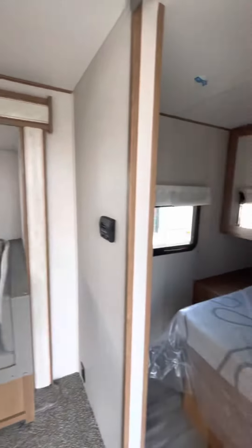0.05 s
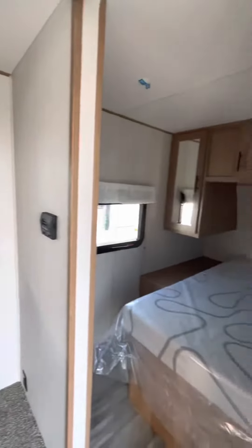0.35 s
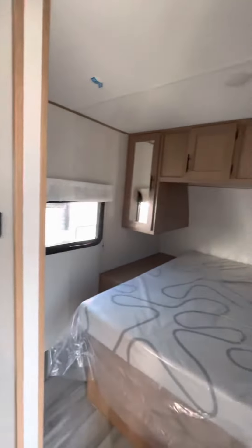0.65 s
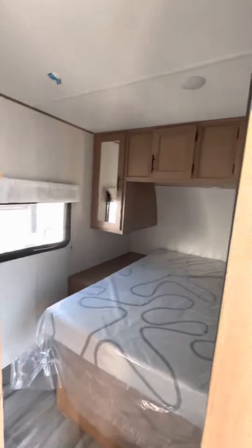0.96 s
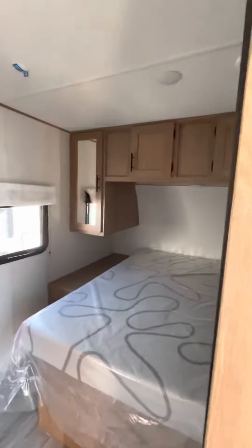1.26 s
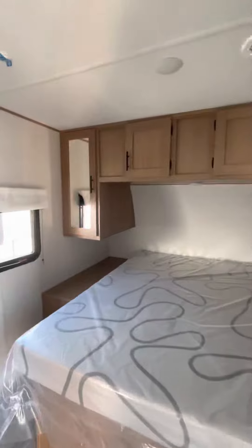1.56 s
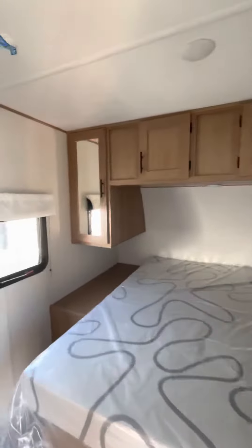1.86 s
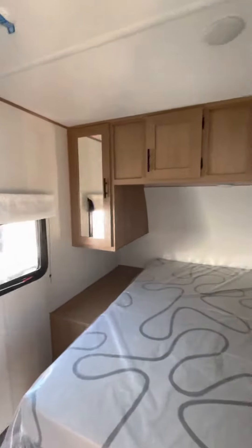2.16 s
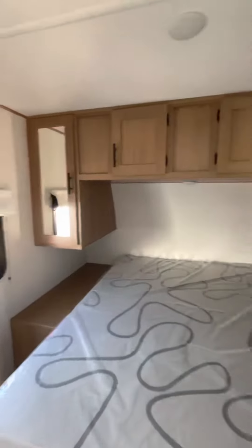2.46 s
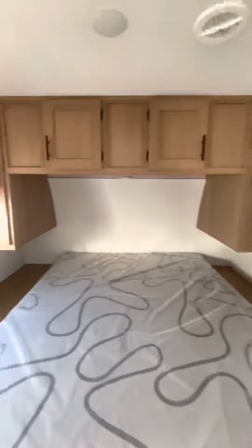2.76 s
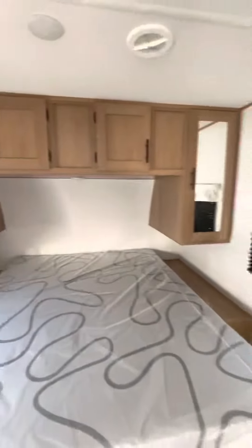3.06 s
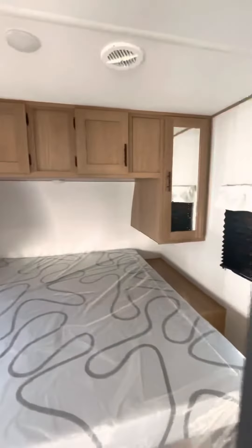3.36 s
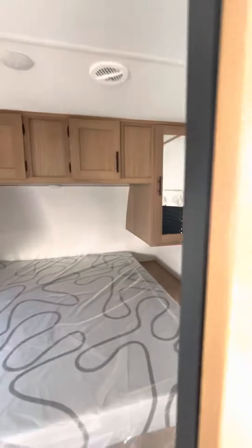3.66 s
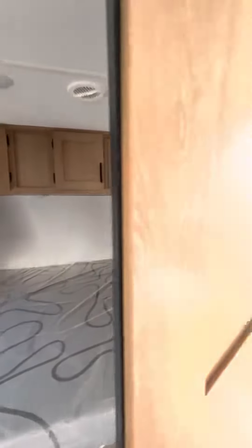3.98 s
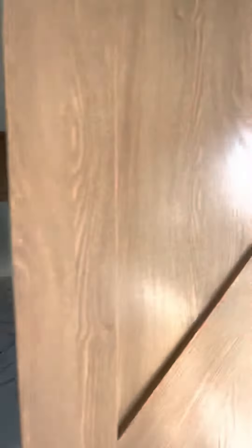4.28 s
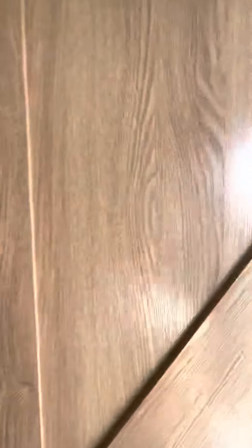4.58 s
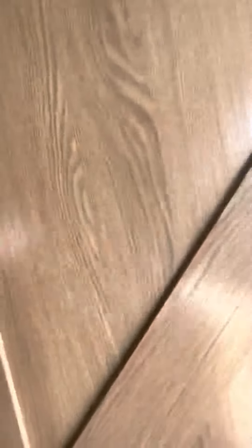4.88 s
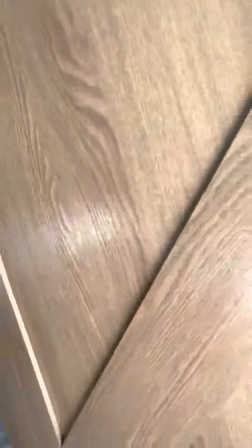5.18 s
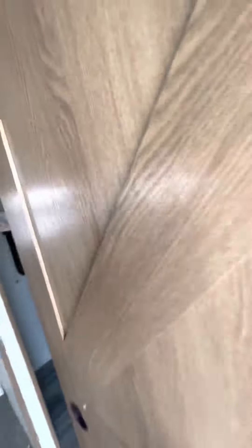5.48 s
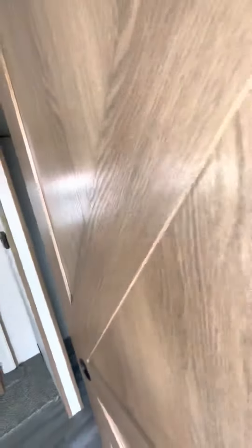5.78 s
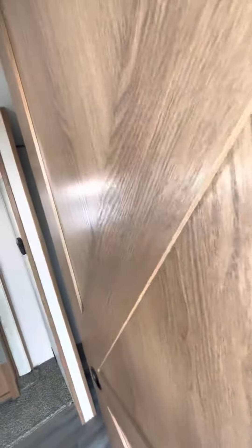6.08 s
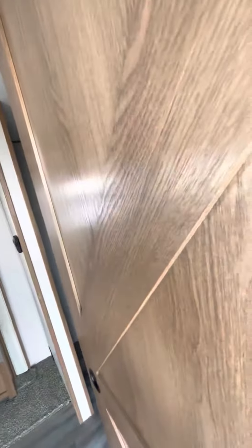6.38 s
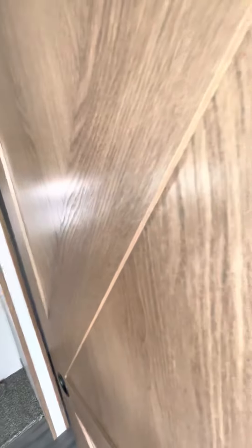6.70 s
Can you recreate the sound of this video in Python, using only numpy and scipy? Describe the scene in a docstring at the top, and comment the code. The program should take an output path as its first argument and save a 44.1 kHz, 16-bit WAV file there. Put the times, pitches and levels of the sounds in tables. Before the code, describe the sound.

A low motor hum runs throughout inside a small travel trailer, gently swelling and fading. In the first second a vehicle passes quietly outside with a soft rush of tyres. Soft, dull footsteps sound on the hollow floor at the start and around 1.5 and 2.5 seconds, then come closer together from 4 seconds. Keys jingle faintly on and off between 2 and 6 seconds. Another vehicle passes around 4.5 seconds with a faint, falling tyre whine. At about 5.6 seconds a light wooden sliding door taps close by, rattles, and knocks hard against its frame at 6 seconds. It rolls briefly and knocks again, louder, at about 6.4 seconds. A metal catch snaps sharply just after, and the door scrapes softly along its track until about 7 seconds. The knocks and snap are much the loudest sounds, with a short cabin ring.

```python
"""Inside a small travel trailer, someone walks the hollow floor with keys jingling faintly.
They handle a light wooden sliding door: its panel rings as it rattles, rolls and knocks twice hard
against the frame, then the metal catch snaps and the door scrapes on along its track.
A motor hums on a low note and its octave. Behind the thin walls, road noise swells and fades
as vehicles pass, the tyres of the nearer ones singing and sinking in pitch."""
import sys
import numpy as np
from scipy import signal
from scipy.fft import rfft, irfft, next_fast_len
from scipy.io import wavfile
from scipy.ndimage import uniform_filter1d, map_coordinates

SR = 44100
rng = np.random.default_rng(int(sys.argv[2]) if len(sys.argv) > 2 else 0)


def store_pcm(level_fs):
    """Save levels as 16-bit WAV."""
    pcm = np.round(np.clip(level_fs, -1, 1) * 32767).astype(np.int16)
    wavfile.write(sys.argv[1], SR, np.atleast_2d(pcm).T)


N = 306054
RING_TIME = np.arange(SR // 2) / SR  # the half second that one hit may ring

# The motor's sagging note. Each row: time in seconds, pitch in Hz.
MOTOR_PITCH = [(0, 73.3), (.6, 72.4), (1.1, 71.7), (6.94, 71.6)]
# Fader rides for its fundamental and octave. Each row: time in seconds, level in dB.
HUM_FADER = [(0, -45.5), (1, -41.5), (2.7, -58.5), (3.6, -49.5), (4.7, -43), (5.5, -55), (6.9, -48.5)]
OCTAVE_FADER = [(0, -42.5), (1, -45), (2.4, -60.5), (2.75, -55), (3.4, -53), (3.7, -77), (4.1, -62)]

# Vehicle pass-bys. Each row: nearest moment, swell and fade in seconds, level and brightness in dB.
PASSES = [(.62, 0.54, 0.67, -49, -5), (4.45, 0.36, 0.82, -53, -1), (5.45, 0.52, 1, -60, 3)]
# Tyre whines. Each row: peak, swell and fade in seconds, centre pitch, total pitch drop and
# half-width in Hz, pure tone over noise in dB, level in dB.
WHINES = [(0.201, .25, 0.41, 1016, 20, 61, -14, -49), (4.64, 0.149, 0.27, 1285, 110, 30.5, -0.5, -49.5)]
# Noise colours for road, floor and door. Each row: frequency in Hz, spectral density in dB.
RUMBLE_EQ = [(20, -39), (30, -16), (45, -3), (95, 1.5), (130, -4), (200, -11.5), (400, -15), (700, -15),
             (1000, -32), (2000, -77)]
RUSH_EQ = [(400, -60), (620, -11.5), (830, 2.5), (1050, 2), (1400, -4), (1800, -24.5), (2500, -57)]
EDGE_EQ = [(1000, -18), (1450, 3.5), (1850, 0.5), (2300, -4), (2700, -7), (3400, -23.5), (6000, -40),
           (12000, -65)]
HISS_EQ = [(1650, -11.5), (2800, -5), (3310, -3.5), (4870, -8.5), (6050, -6), (9060, -20.5), (9820, -34),
           (11100, -12.5), (12400, -29), (16100, -61), (22000, -120)]
WOOD_EQ = [(59, -37), (100, -17), (156, -21), (263, -6.5), (402, -0.5), (900, -5.5), (1120, -14.5),
           (1370, -17.5), (1820, -20.5), (2060, -21.5), (2420, -18.5), (3840, -31.5), (6750, -29),
           (9900, -44.5), (12400, -27.5), (16100, -73), (22000, -120)]
METAL_EQ = [(88, -50), (150, -11.5), (256, -1), (338, -7.5), (399, 0), (734, -4), (820, -13.5), (1120, -3),
            (1710, -10), (3100, -9), (4650, -16), (6600, -8), (9370, -23), (11100, -15), (12400, -36),
            (16100, -72), (22000, -120)]
TRACK_EQ = [(110, -12), (180, -7.5), (365, -2), (444, -13), (655, -8.5), (885, -14), (1020, -14.5),
            (1670, -22), (2850, -13), (7940, -28), (9480, -29), (11100, -17), (12400, -49), (16100, -72),
            (22000, -120)]

# Footfalls on the hollow floor. Each row: start in seconds, boom in dB, knock in dB.
STEPS = [(0.11, -32, -44.5), (1.455, -47, -44.5), (2.495, -41.5, -48), (4.023, -37.5, -53.5),
         (4.608, -31, -39), (4.762, -26.5, -53), (5.058, -35, -52), (5.129, -35, -43), (5.609, -34, -33),
         (6.721, -33, -47)]
# The keys swing together. Each row: strike in seconds, level in dB, large-key and scrape trims in dB.
JINGLES = [(1.9528, -61, -12, 3.5), (2.0343, -46, -28, -5.5), (2.2686, -50, -12, 5.5),
           (2.3005, -45.5, -20, 3.5), (2.4234, -56.5, -5, 2.5), (2.5004, -58.5, -18, 5),
           (2.645, -58.5, -1, -3), (2.8513, -66.5, -2, 11), (2.9022, -63.5, 1, -4),
           (3.2888, -48.5, -4, 4.5), (3.4821, -45.5, -0.5, -5), (3.6498, -54, -1, -1),
           (4.0282, -49, -4, -2), (4.9084, -41.5, -8.5, -2), (5.047, -54.5, -2.5, -11),
           (5.775, -50.5, -2, -5)]
# Door against frame. Each row: start in seconds, level in dB, hardness (added treble) in dB.
KNOCKS = [(5.573, -35, 5), (5.584, -39, 13.5), (5.977, -12, 1), (6.326, -37.5, -28), (6.418, -26, -11),
          (6.430, -7.5, -1), (6.449, -18.5, 11.5), (6.485, -33, 14)]
# The runners' squeak. Each row: time in seconds, pitch in Hz, level in dB.
SQUEAK = [(6.22, 6200, -110), (6.26, 5970, -73), (6.3, 5700, -70), (6.345, 5420, -70), (6.38, 5300, -110)]
# Fader ride for the scrape along the track. Each row: time in seconds, level in dB.
GLIDE_FADER = [(6.5, -120), (6.62, -55), (6.72, -52), (6.8, -41), (6.86, -44.5), (6.9, -40), (6.94, -48)]
# The catch snaps home. Each row: start in seconds, level in dB.
SNAPS = [(6.544, -19), (6.546, -12), (6.5499, -16.5), (6.56, -47)]
# Resonances of the struck parts. Each row: pitch in Hz, level in dB, 60 dB decay in seconds.
SMALL_KEY_MODES = [(10970, 1.5, 0.33), (11600, -5.5, 0.35), (11300, -15, 0.055), (14850, -2, .12)]
LARGE_KEY_MODES = [(6530, 2, 0.081), (8530, 14.5, 0.22), (9100, 5, 0.18), (9200, 1.5, 0.15)]
PANEL_MODES = [(127, -18.5, 0.28), (228, -6, 0.21), (270.5, -2, 0.26), (349.5, -1, 0.11), (389, -2.5, 0.15),
               (451.5, -2.5, 0.1), (528, -7, 0.076), (576, -2.5, 0.1), (658, 0, 0.18), (749, -1, 0.2),
               (1033, -7, 0.12), (1060, -15, 0.1), (1133, -12.5, 0.14), (1301, -15, 0.069),
               (1490, -20.5, 0.19), (1942, -23, 0.14), (2434, -15, 0.072)]
CATCH_MODES = [(506, 1, 0.12), (641, -3, .15), (734, -2, 0.24), (1118, 10.5, 0.11), (1285, 4, 0.05),
               (1974, -4.5, 0.19), (2800, 5.5, 0.08), (2990, 8, 0.1), (3250, -3, 0.11), (4100, 3, 0.072),
               (5450, 0, 0.07), (5900, -10, 0.039), (6435, -17.5, 0.16)]

# The cabin's short reverb. Each row: frequency in Hz, 60 dB decay in seconds.
CABIN_DECAY = [(100, 0.83), (300, 0.31), (1000, 0.34), (3000, 0.28), (6500, 0.28), (12000, 0.31)]
# Stereo width. Each row: frequency in Hz, left-right correlation from -1 to 1.
CORRELATION = [(60, 0.97), (330, 0.99), (600, 0.12), (1230, 0.94), (2630, -0.03), (5600, 0.11),
               (11900, -0.38)]
# The microphone's top end. Each row: frequency in Hz, gain in dB.
MIC_EQ = [(12300, 0), (13000, -38), (15200, -12)]
# Stereo balance. Each row: frequency in Hz, left over right in dB.
BALANCE = [(60, -3.5), (190, -1.5), (400, -7), (1130, -4.5), (2040, 0), (12000, -1)]
# Phase between the channels. Each row: frequency in Hz, the left's lead in radians.
LEFT_LEAD = [(300, 0.25), (550, 0), (800, 0.71), (1200, 1), (2700, 0.0078), (5000, 0.33), (8000, 0)]


def amp(db):
    """Decibels to gain."""
    return 10 ** (np.asarray(db) / 20)


def unit(x):
    """Normalise to rms 1."""
    return x / np.sqrt(np.mean(x ** 2) + 1e-20)


def crest(x):
    """Normalise a stereo hit so that its loudest 6 ms have rms 1."""
    return x / np.sqrt(uniform_filter1d(np.mean(x ** 2, 0), size=256).max() + 1e-20)


def along(points, hz):
    """Read a curve of (Hz, value) points on a log frequency axis."""
    freqs, values = np.transpose(points)
    return np.interp(np.log(hz + 1), np.log(freqs + 1), values)


def automation(rows):
    """One curve, sample by sample, for each column after the time."""
    times, *columns = np.transpose(rows)
    return [np.interp(np.arange(N) / SR, times, column) for column in columns]


def wobble(rate):
    """Smooth random modulation, with rate knots a second."""
    return map_coordinates(rng.standard_normal(int(N * rate / SR) + 4), [np.arange(N) * rate / SR])


def eq(x, response):
    """Shape a sound with a gain that depends on frequency."""
    size = x.shape[-1]
    padded = next_fast_len(size + 8192)
    return irfft(rfft(x, padded) * response(np.fft.rfftfreq(padded, 1 / SR)), padded)[..., :size]


def band(x, low_hz, high_hz):
    """A causal band-pass, gentle enough to keep an attack sharp."""
    return signal.sosfilt(signal.butter(2, [low_hz, high_hz], 'bandpass', fs=SR, output='sos'), x)


def spread(hz):
    """Stereo width as a mid-side angle: near mono in the bass, wide in the treble."""
    return np.arccos(np.clip(along(CORRELATION, hz), -1, 1)) / 2


def noise(colour, size=N):
    """Coloured stereo noise of rms 1."""
    white = rng.standard_normal((2, size))
    mid, side = eq(white, lambda hz: amp(along(colour, hz)) * [np.cos(spread(hz)), np.sin(spread(hz))])
    return unit(np.array([mid + side, mid - side]))


def patchy(x, depth_db):
    """Make a noise churn with patches of random gain, some 100 Hz by 100 ms."""
    spectra = signal.stft(x, nperseg=1024)[2]
    patches = uniform_filter1d(rng.standard_normal(spectra.shape[1:]), size=3, axis=0)
    patches = unit(uniform_filter1d(patches, size=12, axis=1))
    return unit(signal.istft(spectra * amp(depth_db * patches), nperseg=1024)[1][:, :N])


def add(track, start_s, sound):
    """Drop a sound onto the track."""
    part = track[:, round(start_s * SR):][:, :sound.shape[1]]
    part += sound[:, :part.shape[1]]


def attack(rise_s):
    """An exponential fade-in for one hit."""
    return 1 - np.exp(-RING_TIME / rise_s)


def ring(modes, scatter_db):
    """Damped modes, rebalanced on every hit; the higher ones sit wider in stereo."""
    hz, db, t60 = np.transpose(modes)[:, :, None]
    strength, skew = rng.standard_normal((2, len(modes), 1))
    polarity = (-1) ** np.arange(len(modes))[:, None]
    decay = polarity * amp(db + scatter_db * strength - 60 * RING_TIME / t60)
    phase, offset = 2 * np.pi * hz * RING_TIME, skew * spread(hz)
    return crest(np.array([(decay * np.sin(phase + side * offset)).sum(0) for side in (1, -1)]))


def clatter(colour, t60, room_db):
    """Crowded short modes as a noise burst; the small cabin rings on after them."""
    size = len(RING_TIME)
    direct = noise(colour, size) * amp(-60 * RING_TIME / t60)
    hz, t, spectra = signal.stft(noise(colour, size), SR, nperseg=256)
    decay = amp(-60 * t / along(CABIN_DECAY, hz)[:, None])
    tail = signal.istft(spectra * decay, SR, nperseg=256)[1][:, :size]
    return crest(direct + amp(room_db) * tail * attack(0.0012))


def nearness(peak_s, swell_s, fade_s):
    """A straight pass-by: 1 at the peak, 3 dB down swell_s before and fade_s after."""
    t = np.arange(N) / SR - peak_s
    return 1 / np.hypot(1, t / np.where(t < 0, swell_s, fade_s))


def motor():
    """A motor drones unevenly through the walls; its two tones swell and fade across the cabin."""
    hz, = automation(MOTOR_PITCH)
    hum_db, octave_db = automation(HUM_FADER) + automation(OCTAVE_FADER)
    phase = 2 * np.pi * np.cumsum(hz * (1 + 0.0079 * wobble(14))) / SR
    hum = amp(hum_db + 1.5 * wobble(13)) * np.sin(phase)
    octave = amp(octave_db + 1.5 * wobble(17)) * np.sin(2 * phase)
    return np.sqrt(2) * (hum + octave)


def traffic():
    """Each pass lifts a rush with a bright edge and thin hiss; the rumble follows more weakly."""
    distant_db = -66.5  # the bed of far-off traffic
    rush_power, edge_power, hiss_power = amp(distant_db) ** 2, 0, 0
    for peak_s, swell_s, fade_s, db, bright_db in PASSES:
        near = nearness(peak_s, swell_s, fade_s)
        rush_power += (amp(db) * near) ** 2
        edge_power += (amp(db + bright_db + 0.5) * near) ** 2
        hiss_power += (amp(db + bright_db - 8) * near ** 1.56) ** 2  # falls faster with distance
    swell_db = 10 * np.log10(edge_power) - distant_db
    rumble = amp(-56 + 0.57 * swell_db + wobble(8.7)) * patchy(noise(RUMBLE_EQ), depth_db=2)
    rush = np.sqrt(rush_power) * amp(0.69 * wobble(6.8)) * patchy(noise(RUSH_EQ), depth_db=1.9)
    edge = np.sqrt(edge_power) * patchy(noise(EDGE_EQ), depth_db=2.5)
    hiss = np.sqrt(hiss_power) * patchy(noise(HISS_EQ), depth_db=2.5)
    return rumble + rush + edge + hiss


def tyres():
    """A wavering, breathy tone sings with each near pass and sinks in pitch as it goes by."""
    out = np.zeros((2, N))
    for peak_s, swell_s, fade_s, hz, drop_hz, width_hz, pure_db, db in WHINES:
        bearing = np.tanh((np.arange(N) / SR - peak_s) / swell_s)  # -1 coming, 1 going
        breath = noise([(1, 0), (width_hz, -3), (4 * width_hz, -26), (16 * width_hz, -90), (22000, -140)])
        pitch = hz * (1 + 0.0057 * wobble(25)) - drop_hz * bearing / 2
        tone = unit((amp(pure_db) + breath) * np.sin(2 * np.pi * np.cumsum(pitch) / SR))
        out += amp(db) * nearness(peak_s, swell_s, fade_s) ** 1.64 * tone
    return out


def footsteps():
    """Soft soles push the floor, which booms and gives a dull knock."""
    out = np.zeros((2, N))
    for start_s, boom_db, knock_db in STEPS:
        push = clatter(RUMBLE_EQ, t60=0.13, room_db=-14.5) * attack(0.019)
        boom = amp(boom_db - 1.5) * crest(band(push, 36, 98))
        knock = amp(knock_db + 1) * crest(band(push, 152, 292))
        add(out, start_s, boom + knock)
    return out


def keys():
    """Two keys brush, strike and settle in weaker ticks; rubbing roughens their ring."""
    out = np.zeros((2, N))
    tick_eq = [(1500, -12), (3000, 1.5), (7000, 13.5), (12000, -17)]
    rub = unit(1 + 0.8 * wobble(600))
    for strike_s, db, large_db, scrape_db in JINGLES:
        tick = clatter(tick_eq, t60=0.012, room_db=-11)
        scrape = amp(scrape_db) * crest(band(tick, 1700, 9400))
        sparkle = amp(4.5) * crest(band(tick, 12300, 13500))
        brush_s = -rng.uniform(0.015, 0.028)
        settle_s = np.cumsum(rng.uniform(0.01, 0.03, size=2))
        for delay, touch_db in zip([brush_s, 0, *settle_s], [-6.5, 0, -5.5, -5.5]):
            small_key = amp(-9.5) * ring(SMALL_KEY_MODES, scatter_db=7)
            large_key = amp(large_db - 1.5) * ring(LARGE_KEY_MODES, scatter_db=1.5)
            roughness = rub[round((strike_s + delay) * SR):][:len(RING_TIME)]
            touch = amp(-3 * (delay != 0)) * scrape + sparkle + (small_key + large_key) * roughness
            force_db = touch_db - 47 * abs(delay)  # softer the further from the strike
            add(out, strike_s + delay, amp(db + force_db) * touch * attack(0.0015))
    return out


def key_click():
    """One key strikes the ring squarely: a dry, hard tick among the jingles."""
    out = np.zeros((2, N))
    tick = crest(band(clatter(METAL_EQ, t60=0.021, room_db=-20), 3250, 10000))
    add(out, start_s=3.2893, sound=amp(-45.5) * tick)
    return out


def door_hits(contacts):
    """Each contact rings the hollow panel; the harder it is, the more clack and crack it wakes."""
    out = np.zeros((2, N))
    for start_s, db, hard_db in contacts:
        modes = ring(PANEL_MODES, scatter_db=2)
        panel = attack(0.00038) * (modes + amp(2) * clatter(WOOD_EQ, t60=0.043, room_db=-11.5))
        edge = attack(0.0021) * clatter(WOOD_EQ, t60=0.043, room_db=-16)
        thump = amp(-8) * crest(band(panel, 120, 233))
        body = crest(band(panel, 305, 713))
        clack = amp(-3 + 0.2 * hard_db) * crest(band(panel, 848, 3400))
        crack = amp(-16 + hard_db) * crest(band(edge, 3080, 10700))
        add(out, start_s, amp(db) * (thump + body + clack + crack))
    return out


def door_rattle():
    """The door chatters in its guide: six evenly spaced contacts build up and die away."""
    peak_s, gap_s, peak_db, hard_db = 5.891, 0.0145, -20.5, 2
    rise_db, fall_db = 8, 3  # per contact
    return door_hits([(peak_s + k * gap_s, peak_db + min(k * rise_db, -k * fall_db), hard_db)
                      for k in range(-2, 4)])


def door_roll():
    """The panel rumbles on its runners, louder as it gathers speed, until it meets the stop."""
    stop_s, run_up_s = 6.42, 0.36
    to_go = (stop_s - np.arange(N) / SR) / run_up_s
    speed = np.clip(1 - to_go, 0, 1) * (to_go > 0)
    return amp(-43) * speed * unit(band(noise(TRACK_EQ), 180, 560))


def runner_squeak():
    """The runners give a faint, fluttering squeak that slides down in pitch."""
    hz, db = automation(SQUEAK)
    return amp(db + 2 * wobble(50)) * np.sin(2 * np.pi * np.cumsum(hz) / SR)


def catch():
    """The metal catch chatters into place within a few milliseconds."""
    out = np.zeros((2, N))
    for start_s, db in SNAPS:
        snap = clatter(METAL_EQ, t60=0.057, room_db=-10.5) + amp(-3) * ring(CATCH_MODES, scatter_db=1)
        add(out, start_s, amp(db) * snap * attack(0.0001))
    return out


def door_glide():
    """The runners scrape unevenly along the track, with a fine grain."""
    db, = automation(GLIDE_FADER)
    uneven_db = 1.6 * wobble(35)
    scrape = unit(noise(TRACK_EQ) * amp(0.81 * wobble(600)))
    return amp(db + uneven_db) * scrape


def scene():
    """The mix: door and walker up front, motor and road behind."""
    door = door_hits(KNOCKS) + door_rattle() + catch() + door_roll() + runner_squeak() + door_glide()
    walker = footsteps() + keys() + key_click()
    return door + walker + motor() + traffic() + tyres()


def record(dry):
    """Stereo microphone: bass leans right, mids lead on the left, peaks soft-clip, the top is dull."""
    ceiling, top_hz = 0.95, 15200
    side = np.array([[0.5], [-0.5]])

    def response(hz):
        gain = amp(along(MIC_EQ, hz) + side * along(BALANCE, hz))
        return gain * np.exp(1j * side * along(LEFT_LEAD, hz))

    stereo = eq(dry, response)
    rounded = stereo / (1 + (stereo / ceiling) ** 8) ** (1 / 8)
    return eq(rounded, lambda hz: hz < top_hz)


dry = scene()
out = record(dry)
store_pcm(out)
```